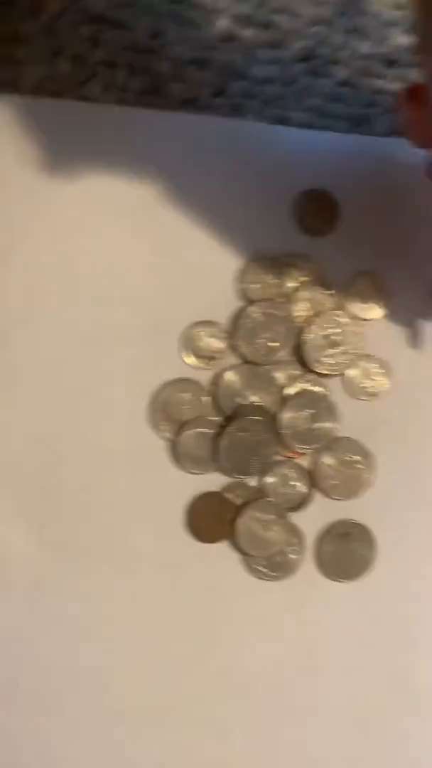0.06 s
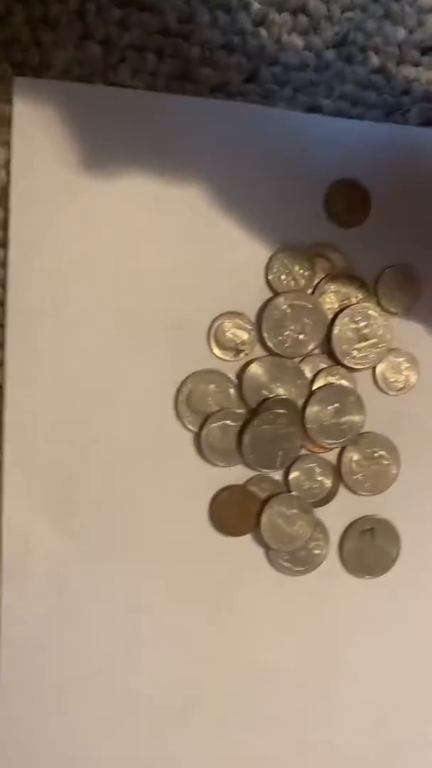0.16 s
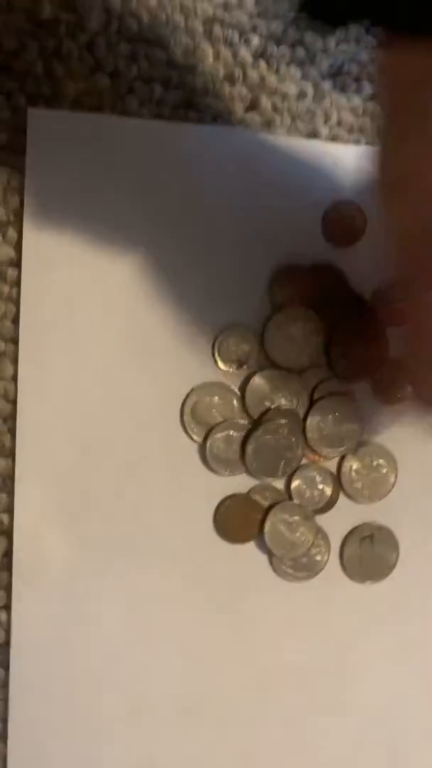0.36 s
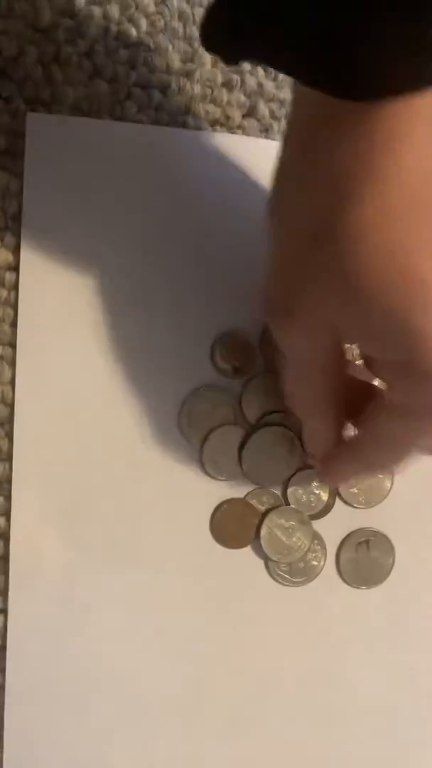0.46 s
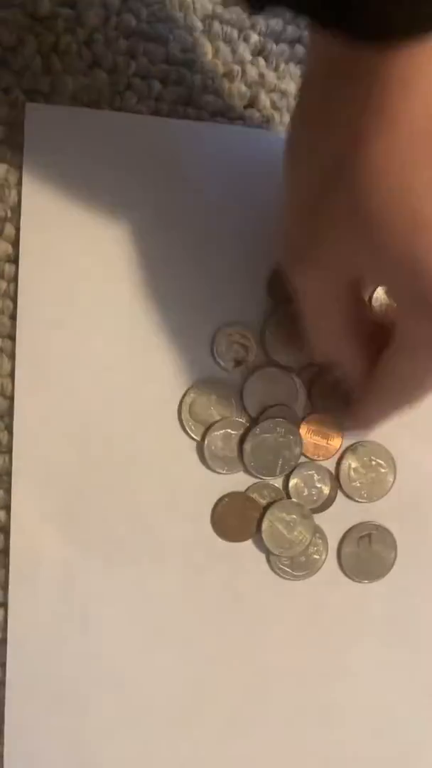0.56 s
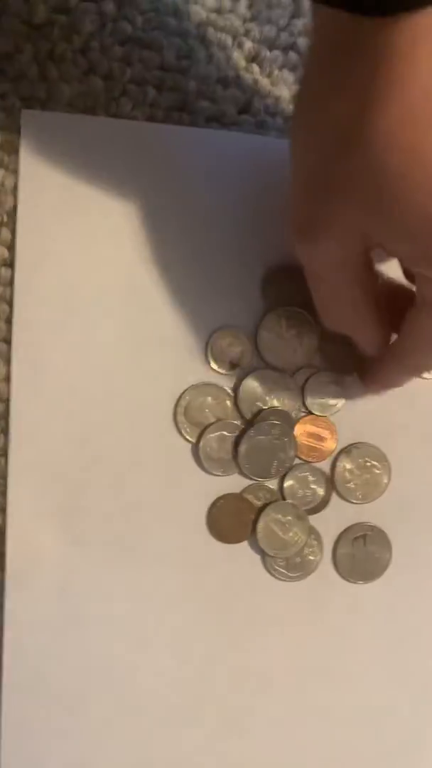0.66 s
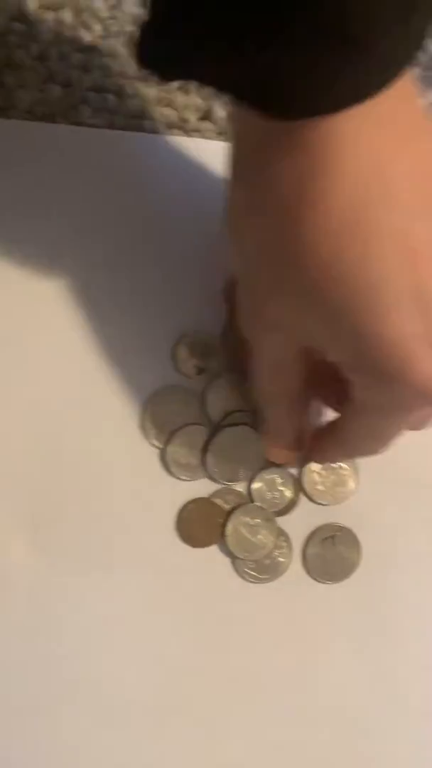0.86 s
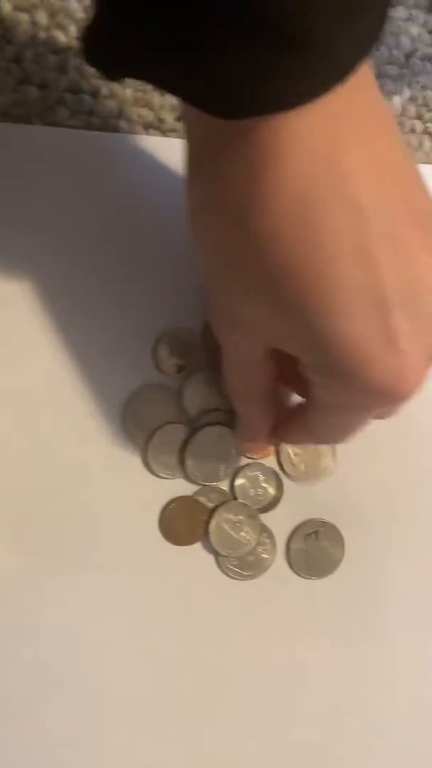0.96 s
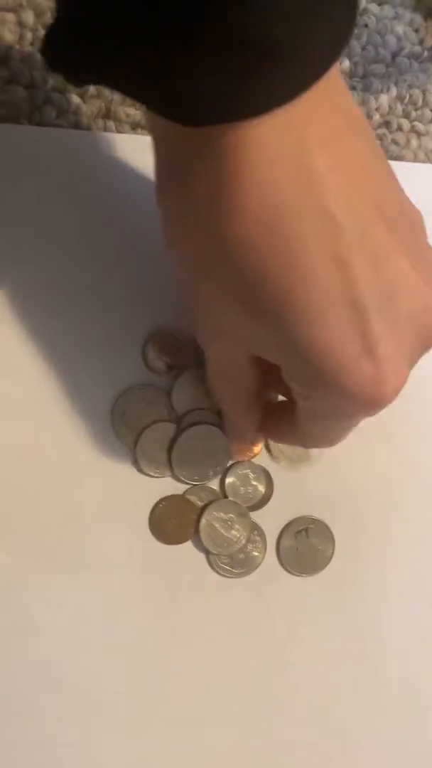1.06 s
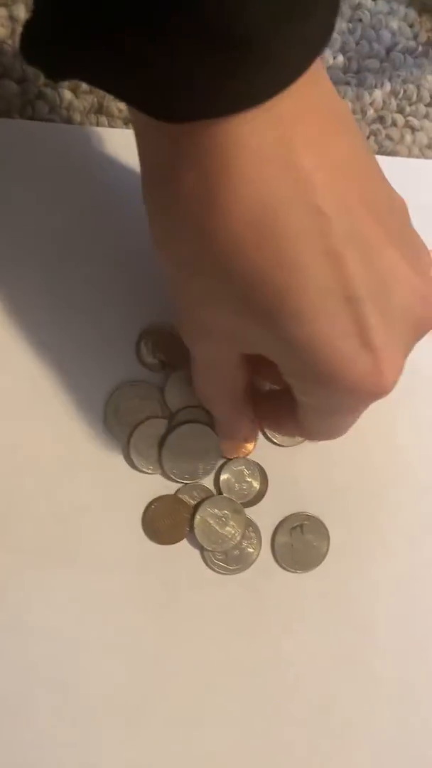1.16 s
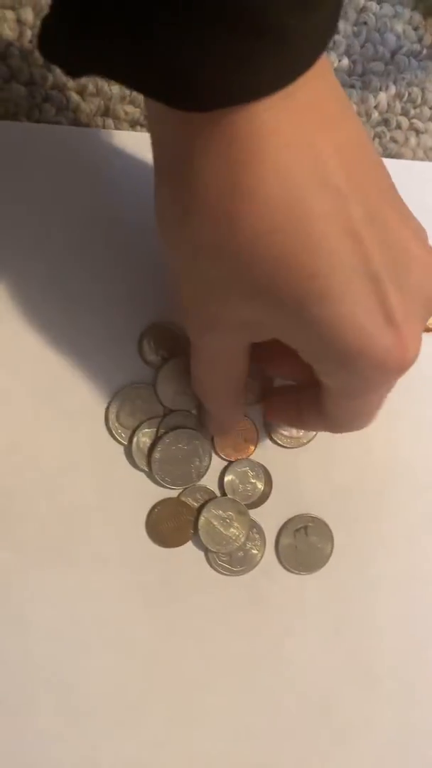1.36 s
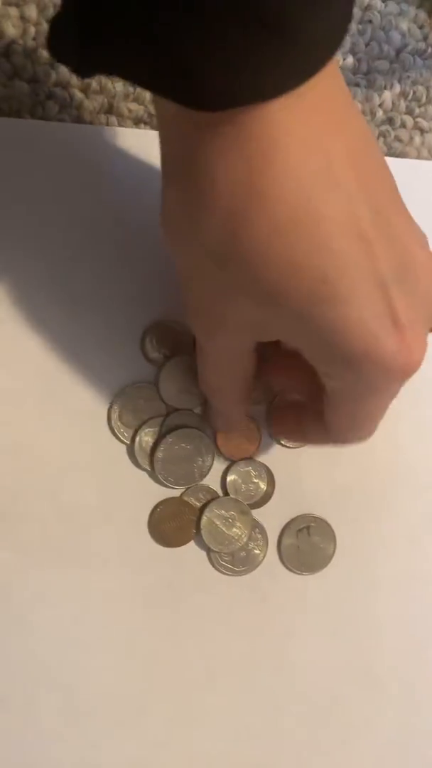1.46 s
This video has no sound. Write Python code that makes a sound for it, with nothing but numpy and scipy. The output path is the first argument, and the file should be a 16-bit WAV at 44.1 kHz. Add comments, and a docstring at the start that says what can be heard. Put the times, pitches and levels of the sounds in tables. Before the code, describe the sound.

Bright clinks of coins being dropped, shuffled and picked at on a sheet of paper.

```python
"""A dropped coin and a heap of coins

A hand drops a small coin onto paper on a carpet, then pushes through a heap of coins and picks at it.
At each hit the rims chatter, the metal rings briefly and the paper thuds. Sliding coins catch and slip,
a sleeve rustles and a fingertip drags over the sheet. It is all heard close up, in a small, quiet room
with a low hum."""
import sys
import numpy as np
from scipy import signal
from scipy.fft import rfft, irfft, next_fast_len
from scipy.io import wavfile
from scipy.ndimage import map_coordinates

SR = 44100
rng = np.random.default_rng(int(sys.argv[2]) if len(sys.argv) > 2 else 0)


def generate_wav(signal):
    """Clip the signal to [-1, 1] and save it as 16-bit WAV at the path in sys.argv[1]."""
    frames = np.transpose(np.atleast_2d(signal))
    scaled = np.clip(frames, -1, 1) * 32767
    pcm = np.round(scaled).astype(np.int16)
    wavfile.write(sys.argv[1], SR, pcm)


N = 66150

# Loudness of the hum: t/s, level/dB
HUM_LEVELS = [(0, -64), (.06, -60), (.12, -69), (.19, -63), (.25, -80), (.32, -66.5), (.39, -62.5),
              (.47, -63.5), (.53, -74), (.61, -66.5), (.78, -61.5), (.87, -62.5), (.92, -68.5), (1.03, -72),
              (1.10, -62), (1.27, -66), (1.34, -74), (1.43, -66), (1.5, -69.5)]
# Tones in the hum: multiple of its pitch, relative level/dB
HUM_TONES = [(1, 3.5), (2, -14.5), (3, -8.5)]
# Loudness of the moving hand: t/s, paper level/dB, sleeve level/dB
HAND_LEVELS = [(0, -78, -105), (.19, -77.5, -82.5), (.25, -60, -69), (.37, -59.5, -71.5), (.47, -65, -80),
               (.505, -61, -71), (.53, -52.5, -75), (.60, -61.5, -55), (.73, -60.5, -62), (.80, -64, -71.5),
               (.87, -60, -68.5), (1.02, -63, -68), (1.09, -62, -69.5), (1.23, -62, -70),
               (1.34, -76.5, -80), (1.40, -82, -95), (1.45, -64.5, -87), (1.5, -69, -83)]
# Loudness of coins sliding: t/s, level/dB
SLIDE_LEVELS = [(.235, -55), (.255, -62), (.30, -71.5), (.33, -68), (.41, -108), (.49, -75), (.505, -55),
                (.512, -54), (.535, -45), (.57, -55), (.62, -57), (.665, -63), (.69, -77), (.76, -90),
                (.90, -69), (.945, -52), (.98, -67), (1.03, -100), (1.040, -53.5), (1.085, -57),
                (1.11, -69.5), (1.19, -63), (1.21, -76), (1.24, -75.5), (1.285, -66.5), (1.35, -96)]
# Loudness of the dragging fingertip: t/s, level/dB
FINGER_LEVELS = [(1.34, -95), (1.365, -71), (1.40, -83), (1.42, -63.5), (1.455, -63), (1.48, -62.5),
                 (1.5, -70)]

# Hits of the dropped coin, then of the heap:
# t/s, click level/dB, ring level/dB, thud level/dB, favoured ring f/Hz, favoured thud f/Hz
DROP_HITS = [(.2006, -44, -57, -48.5, 6350, 596), (.2415, -51.5, -59, -39.5, 7650, 1090),
             (.2447, -43.5, -35, -73, 10800, 1020), (.2562, -71, -44, -48, 12900, 520),
             (.2695, -50.5, -49, -72, 12800, 550), (.2875, -49.5, -66, -57, 8900, 610),
             (.2972, -49.5, -56, -49.5, 9100, 550), (.3462, -57, -83, -52.5, 5700, 615),
             (.3795, -64.5, -104, -66, 4900, 660)]
HEAP_HITS = [(.4815, -51, -40.5, -79, 15600, 700), (.4850, -47.5, -46, -53.5, 15700, 650),
             (.5090, -47.5, -66, -72, 5600, 600), (.5215, -52, -47, -69, 7700, 250),
             (.5275, -45, -36.5, -62, 14200, 220), (.5322, -49, -37, -40.5, 9150, 470),
             (.5385, -43.5, -38, -62, 5570, 474), (.5435, -55, -44, -57, 4970, 700),
             (.5525, -33, -29, -37.5, 14100, 1320), (.5608, -46, -46, -53, 4920, 483),
             (.5655, -38, -38.5, -38.5, 9350, 505), (.5792, -48, -45, -79, 9300, 700),
             (.5922, -46, -46, -47.5, 10500, 700), (.6088, -40.5, -38, -55, 15600, 1200),
             (.6325, -53, -44.5, -52, 14100, 716), (.6432, -51, -51, -62, 4500, 700),
             (.6505, -52, -48, -82, 4210, 710), (.6585, -52, -44, -57, 12300, 720),
             (.6650, -48, -38, -77, 15650, 490), (.6735, -59, -69, -43.5, 4860, 740),
             (.6920, -42, -37, -55.5, 15120, 424), (.7215, -56.5, -76, -84, 8650, 690),
             (.8480, -74, -57, -75, 9330, 710), (.8550, -63, -41.5, -65, 14600, 705),
             (.8612, -46, -42.5, -50.5, 12100, 700), (.9165, -54, -58, -51.5, 12700, 1510),
             (.9440, -54, -60, -58.5, 5350, 1210), (.9555, -67, -54, -67, 15000, 704),
             (.9648, -46, -43, -50.5, 14800, 725), (.9830, -68, -56.5, -74, 10400, 700),
             (1.0388, -72, -60, -60, 8300, 1240), (1.0525, -70, -76, -50.5, 5200, 1500),
             (1.0770, -62, -55, -51, 12300, 730), (1.0890, -60, -58, -48.5, 7100, 548),
             (1.1295, -61, -62, -73, 9540, 700), (1.1490, -63, -58, -85, 4800, 700),
             (1.1703, -61, -57, -75, 6960, 704), (1.1885, -56.5, -63, -57, 9200, 700),
             (1.2360, -69, -62, -80, 4770, 700), (1.2545, -68, -63, -81, 14700, 700),
             (1.2695, -62.5, -67, -87, 8980, 690), (1.3300, -71, -65, -87, 6880, 700),
             (1.4280, -68, -72.5, -67, 7340, 600)]
# Modes, the tones a coin rings with: f/Hz, relative level/dB, time to fade by 60 dB/s
DROP_MODES = [(9448, -16, .1), (9781, -13, .12), (10790, -15, .08), (12667, -8, .15), (12784, -5, .12),
              (12840, -5, .13), (12904, -4, .14), (12954, -2, .24), (13090, -8, .14), (13300, -7, .05),
              (15500, -17, .05)]
HEAP_COIN_MODES = [(4780, -3, 0.12), (6280, -4.5, 0.052), (7410, -7, 0.14), (8080, -7.5, 0.064),
                   (9070, -6, 0.2), (9190, -3.5, 0.2), (10400, -5.5, 0.036), (12440, -7.5, 0.06),
                   (14000, -4.5, 0.053), (15340, -1, 0.11), (15300, -7, 0.14)]
# Resonances of coins rubbing together: f/Hz, width/Hz, relative level/dB
RUB_RESONANCES = [(1520, 470, 0), (2674, 96, 0.5), (3260, 54, 0.5), (4640, 450, -1), (5010, 410, 1),
                  (6500, 160, -2.5), (7520, 34, -1), (8140, 310, -10), (9100, 160, -7),
                  (10500, 1100, -10.5), (14400, 2000, -0.5)]

# Spectra, how strong each noise is from bass to treble: f/Hz, relative level/dB
ROOM_NOISE_SPECTRUM = [(25, -21), (50, -3.5), (100, 3), (160, -5.5), (230, -1), (320, -8), (450, -24),
                       (1000, -23.5), (2500, -30.5), (5000, -30), (9000, -34.5), (16000, -43)]
PAPER_SPECTRUM = [(25, -50), (50, -11), (110, -7), (160, 3.5), (240, 4.5), (320, 7), (400, -6.5),
                  (700, -4.5), (900, -9.5), (1800, -34.5), (4000, -55), (12000, -82)]
SLEEVE_SPECTRUM = [(300, -1), (700, -2), (1200, -2.5), (1900, -2), (2250, -1), (2550, 3.5), (2950, -1),
                   (3500, -6), (4700, -8), (6500, -23), (15000, -35)]
DROP_CLICK_SPECTRUM = [(300, -6), (1000, 4.5), (2500, -7), (3800, 4.5), (5000, 0), (6600, 2), (8000, -3),
                       (11300, -1), (15500, -14)]
THUD_SPECTRUM = [(25, -70), (60, -46), (200, -13.5), (500, 5.5), (700, 1.5), (850, -7), (1150, -1),
                 (1700, -6.5), (3000, -22), (8000, -90)]
SCRAPE_SPECTRUM = [(200, -8), (600, -3.5), (1300, -8.5), (2000, 0), (3800, -9.5), (4900, 2.5), (5800, -1),
                   (7400, -4.5), (8600, -11), (9300, -14), (11300, -34), (15500, -34)]
HEAP_CLICK_SPECTRUM = [(300, -21), (1000, -7.5), (2000, -2.5), (3200, -0.5), (4800, 6.5), (5700, -0.5),
                       (6500, 2), (8200, -7), (9400, 4), (11500, -4.5), (15500, -2)]
FINGER_SPECTRUM = [(200, -7.5), (450, 4), (750, 0.5), (1100, -9.5), (1800, -13), (3200, -29), (4800, -19),
                   (9000, -37)]
# How long the room echoes: f/Hz, time to fade by 60 dB/s
ROOM_DECAY = [(200, 0.35), (2000, 0.11), (6000, 0.21), (15000, 0.18)]

HUM_HZ, TOP_HZ = 75.5, 15950
CLICK_HOLD_S, CLICK_T60_S = 0.0029, 0.0069  # rims chatter, then settle; T60 is the time to fade by 60 dB
THUD_RISE_S, THUD_T60_S = 0.0011, 0.038
DROP_DETUNE, HEAP_DETUNE = 0.0011, 0.0104  # pitch spread from hit to hit: mixed coins differ more
DAMP_S, FREE_SHARE = 0.0054, 0.19  # neighbours soon damp the ring down to this share
GRIP_S, GRIP_SHARE, GRIP_DB_PER_S = .8, .18, 692  # from GRIP_S on, fingers hold the coins and mute them


def amp(db):
    """Turn decibels into a gain."""
    return 10 ** (np.asarray(db) / 20)


def unit(x):
    """Scale to an average (rms) level of 1."""
    return x / np.sqrt(np.mean(x ** 2) + 1e-20)


def along(points, hz):
    """Read between (Hz, value) points on a log frequency axis."""
    f, v = np.transpose(points)
    return np.interp(np.log(hz + 1), np.log(f + 1), v)


def curves(rows):
    """One value per sample for each column after the time."""
    times, *columns = np.transpose(rows)
    return [np.interp(np.arange(N) / SR, times, column) for column in columns]


def wobble(rate):
    """A smooth curve through rate random points a second."""
    return map_coordinates(rng.standard_normal(int(N * rate / SR) + 4), [np.arange(N) * rate / SR])


def swing(rate):
    """A wobble held between -1 and 1."""
    return np.tanh(wobble(rate))


def bump(hz, centre_hz, octaves):
    """A bell curve from 0 to 1 around one frequency."""
    return np.exp(-.5 * (np.log2((hz + 1) / centre_hz) / octaves) ** 2)


def filtered(x, response):
    """Multiply each frequency in x by response(hz)."""
    size = next_fast_len(N + SR // 4)
    return irfft(rfft(x, size) * response(np.fft.rfftfreq(size, 1 / SR)), size)[:N]


def noise(spectrum, grain_db=0):
    """Noise with the given spectrum; grain_db roughens it into millisecond grains."""
    grains = amp(grain_db * wobble(1000))
    return unit(filtered(grains * rng.standard_normal(N), lambda hz: amp(along(spectrum, hz))))


def burst(envelope, spectrum, centre_hz, octaves, boost_db, grain_db=0):
    """A short noise that follows a loudness envelope, boosted around one frequency."""
    count = len(envelope)
    hz = np.fft.rfftfreq(count, 1 / SR)
    white = rng.standard_normal(count)
    grains = amp(grain_db * np.repeat(np.tanh(rng.standard_normal(count)), 24)[:count])
    colour = amp(along(spectrum, hz) + boost_db * bump(hz, centre_hz, octaves))
    sound = envelope * irfft(rfft(white * grains) * colour, count)
    return sound * np.linalg.norm(envelope) / np.linalg.norm(sound)


def add(track, start_s, sound):
    """Mix a sound into the track."""
    part = track[round(start_s * SR):][:len(sound)]
    part += sound[:len(part)]


def background():
    """A low wavering hum over faint room noise."""
    level_db, = curves(HUM_LEVELS)
    cycles = np.cumsum(HUM_HZ * (1 + 0.011 * wobble(7.6))) / SR
    hum = sum(amp(db) * np.sin(2 * np.pi * (round(k) * cycles + rng.random())) for k, db in HUM_TONES)
    return np.sqrt(2) * amp(level_db) * hum + amp(-70.5) * noise(ROOM_NOISE_SPECTRUM)


def hand_rustle():
    """The hand rubs the paper on the carpet and the sleeve brushes along."""
    paper_db, sleeve_db = curves(HAND_LEVELS)
    paper = amp(paper_db) * noise(PAPER_SPECTRUM, grain_db=2.5)
    sleeve = amp(sleeve_db) * noise(SLEEVE_SPECTRUM, grain_db=3)
    return paper + sleeve


def coin_hits(hits, modes, click_spectrum, detune, mixed):
    """Each hit is a click of chattering rims, a quickly damped ring and a thud of the paper."""
    t = np.arange(SR // 4) / SR
    mode_hz, mode_db, t60 = np.transpose(modes)[:, :, None]
    click_shape = amp(-60 * np.maximum(t - CLICK_HOLD_S, 0) / CLICK_T60_S) * (1 - np.exp(-t / 0.00025))
    thud_shape = amp(-60 * t / THUD_T60_S) * (1 - np.exp(-t / THUD_RISE_S))
    ring_shape = amp(-60 * t / t60) * (1 - np.exp(-t / 0.0013))
    track = np.zeros(N)
    for start_s, click_db, ring_db, thud_db, favoured_hz, thud_hz in hits:
        strength, tuning, phase = rng.standard_normal((3, len(modes), 1))
        hz = mode_hz * (1 + detune * tuning)
        spot_db = 10 * bump(mode_hz, favoured_hz, octaves=0.2)  # the spot struck favours some modes
        gain = amp(mode_db + 0.5 * strength + spot_db)
        if mixed:  # the mode nearest the favoured ring pitch moves onto it and rings strongest
            nearest = np.argmin(abs(mode_hz - favoured_hz))
            hz[nearest], gain[nearest] = favoured_hz, gain.max()
        tones = np.sin(2 * np.pi * (hz * t + phase))
        ring = np.sqrt(2) * (gain / np.linalg.norm(gain) * ring_shape * tones).sum(0)
        free = FREE_SHARE if start_s < GRIP_S else GRIP_SHARE * amp(-GRIP_DB_PER_S * t)
        damping = free + (1 - free) * np.exp(-(t / DAMP_S) ** 2)
        click = burst(click_shape, click_spectrum, favoured_hz, octaves=0.2, boost_db=6, grain_db=8.5)
        thud = burst(thud_shape, THUD_SPECTRUM, thud_hz, octaves=.22, boost_db=8)
        add(track, start_s, amp(ring_db) * damping * ring + amp(click_db) * click + amp(thud_db) * thud)
    return track


def early_echoes(x):
    """Eight quick echoes off the hand, the arm and the floor colour every click."""
    distance, strength = rng.random((8, 2)).T
    delay_s = .012 * (0.0802 + distance)
    gain = (strength - .5) / np.linalg.norm(strength - .5)
    return filtered(x, lambda hz: sum(g * np.exp(-2j * np.pi * hz * d) for g, d in zip(gain, delay_s)))


def room_echo(x):
    """The small room adds a short tail that lasts longest in the bass."""
    hz, t, bands = signal.stft(rng.standard_normal(SR // 2), SR, nperseg=256)
    fade = amp(-60 * t / along(ROOM_DECAY, hz)[:, None])
    _, tail = signal.istft(bands * fade, SR, nperseg=256)
    tail *= 1 - np.exp(-np.arange(len(tail)) / SR / 0.00086)  # soft start
    return signal.fftconvolve(x, tail / np.linalg.norm(tail))[:N]


def sliding_coins():
    """Ridged rims catch and slip, ringing resonances that come, go and drift as the coins shift."""
    level_db, = curves(SLIDE_LEVELS)
    moving = np.arange(N) / SR > SLIDE_LEVELS[0][0]
    slips = rng.standard_normal(N) * amp(8 * swing(700))
    rub = np.zeros(N)
    for hz, width, db in RUB_RESONANCES:
        resonance = filtered(slips, lambda f: 1j * f * width / (hz * hz - f * f + 1j * f * width))
        rub += amp(db + 1.5 * swing(35)) * unit(resonance)
    rub = map_coordinates(rub, [np.cumsum(1 + .015 * swing(35))])  # the pitch drifts by up to 1.5 %
    roughness = amp(4.5 * swing(150) + 3 * swing(1200))
    scrape = roughness * noise(SCRAPE_SPECTRUM)
    return moving * amp(level_db) * (amp(-4) * unit(rub) + amp(-6) * unit(scrape))


def jingle(start_s=.526, end_s=.672, count=44):
    """As the hand pushes through the heap, coins touch lightly, each ringing with a strong tone at 700 Hz and
    thudding at a scattered pitch, ever softer."""
    hits = []
    for progress, pitch, softness in rng.random((count, 3)):
        time_s = start_s + (end_s - start_s) * progress
        ring_db = -43 - 10 * progress - 7 * softness
        favoured_hz = 6000 + 9000 * pitch
        hits.append((time_s, ring_db - 7, ring_db, ring_db - 28, 700, favoured_hz))
    return coin_hits(hits, HEAP_COIN_MODES, HEAP_CLICK_SPECTRUM, HEAP_DETUNE, mixed=True)


def fingertip():
    """A fingertip drags over the paper with a grainy hiss."""
    level_db, = curves(FINGER_LEVELS)
    return amp(level_db) * noise(FINGER_SPECTRUM, grain_db=5.5)


def scene():
    """Mix the coins, their echoes, the hand and the background into one channel."""
    drop = coin_hits(DROP_HITS, DROP_MODES, DROP_CLICK_SPECTRUM, DROP_DETUNE, mixed=False)
    heap = coin_hits(HEAP_HITS, HEAP_COIN_MODES, HEAP_CLICK_SPECTRUM, HEAP_DETUNE, mixed=True)
    coins = drop + heap + jingle() + sliding_coins()
    echoes = amp(-12) * early_echoes(coins) + amp(-9) * room_echo(coins)
    return (coins + echoes + hand_rustle() + fingertip() + background())[None]


def record(dry):
    """Cut off the highest treble, from around TOP_HZ up."""
    treble_cut = lambda hz: np.clip((TOP_HZ - hz) / 300 + .5, 0, 1) ** 2
    return np.array([filtered(channel, treble_cut) for channel in dry])


dry = scene()
out = record(dry)
generate_wav(out)
```